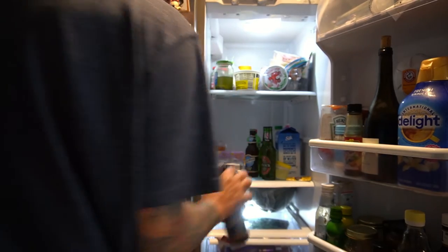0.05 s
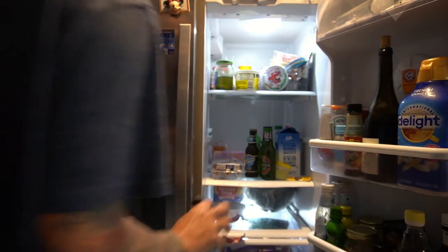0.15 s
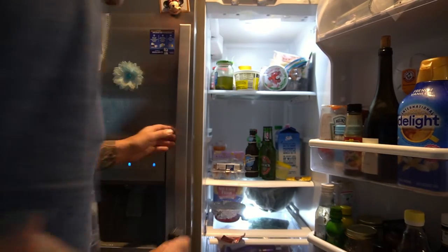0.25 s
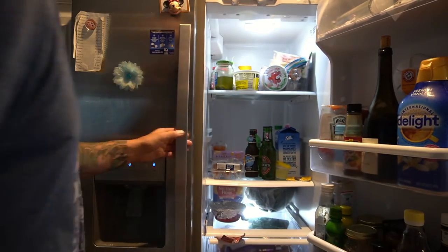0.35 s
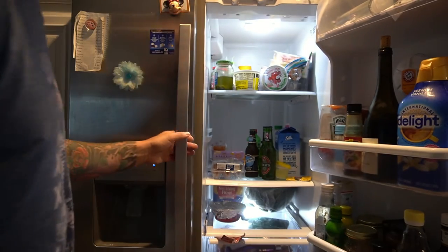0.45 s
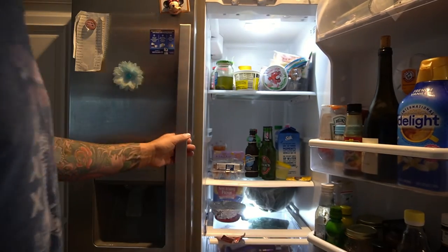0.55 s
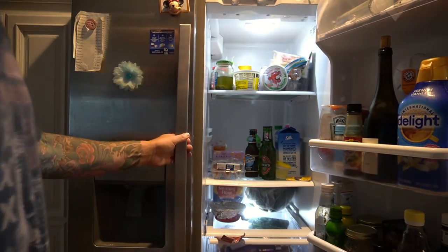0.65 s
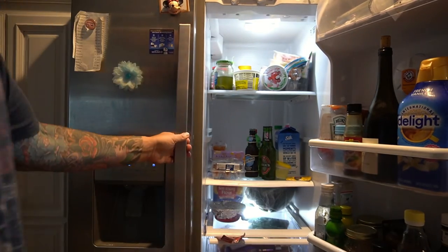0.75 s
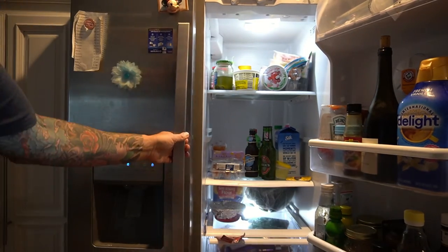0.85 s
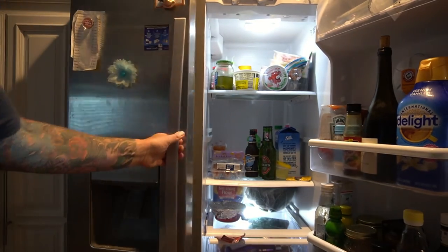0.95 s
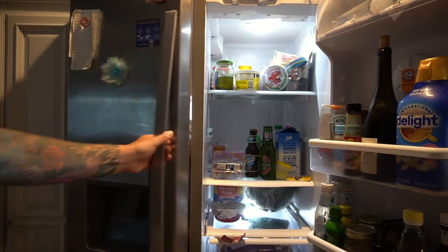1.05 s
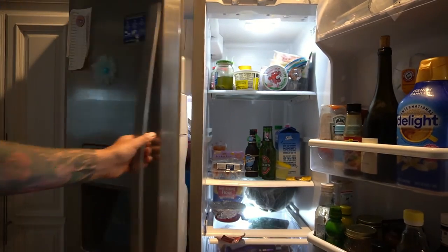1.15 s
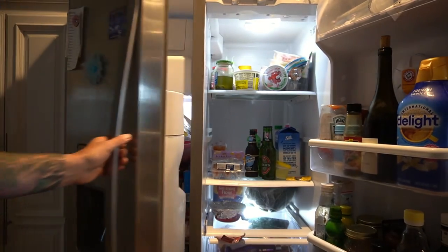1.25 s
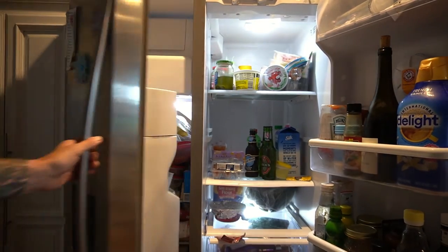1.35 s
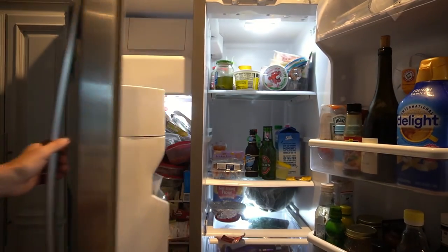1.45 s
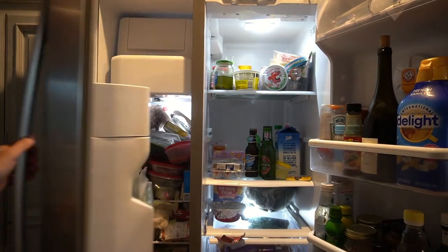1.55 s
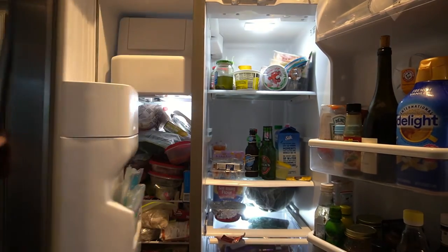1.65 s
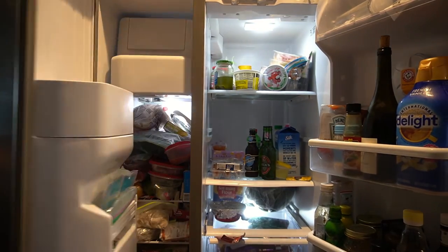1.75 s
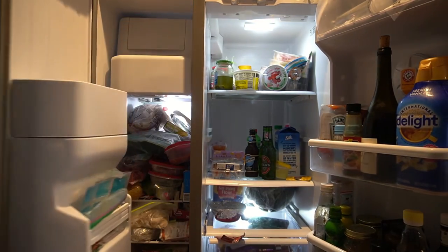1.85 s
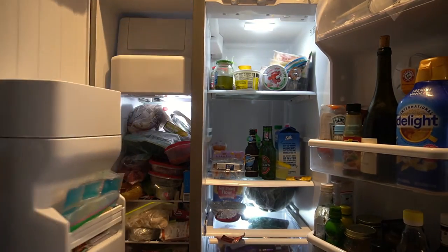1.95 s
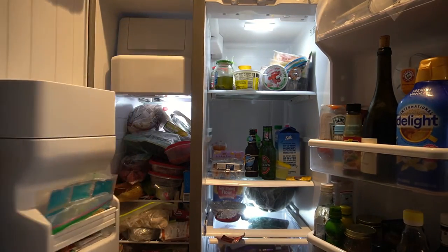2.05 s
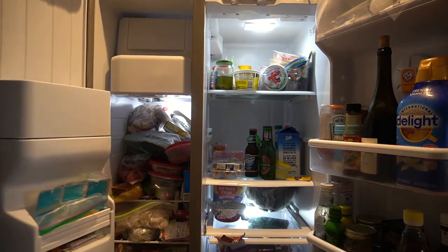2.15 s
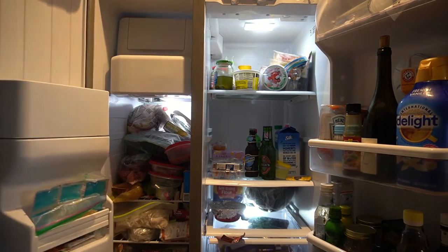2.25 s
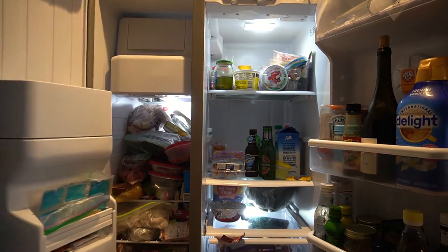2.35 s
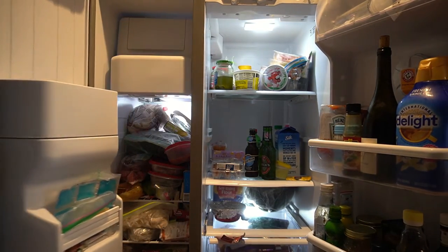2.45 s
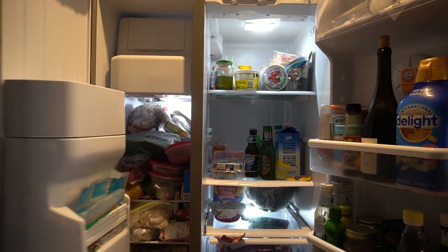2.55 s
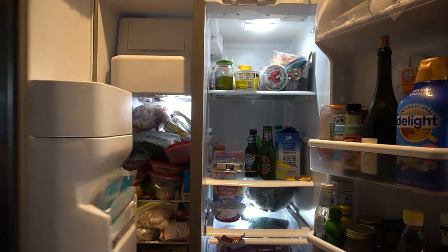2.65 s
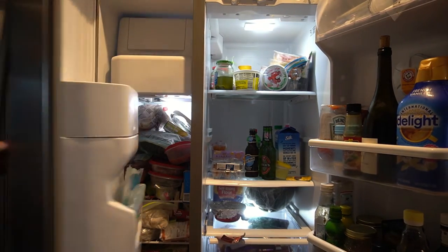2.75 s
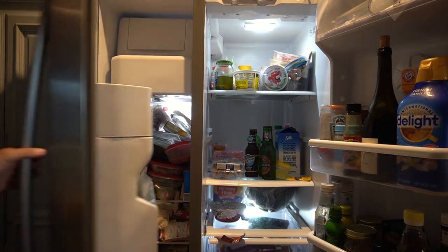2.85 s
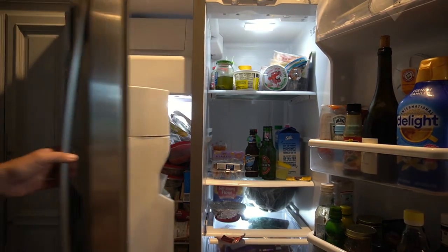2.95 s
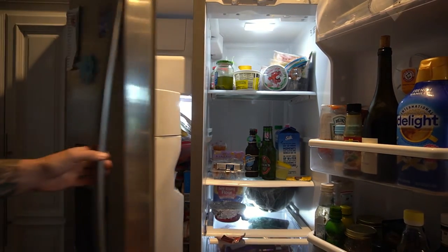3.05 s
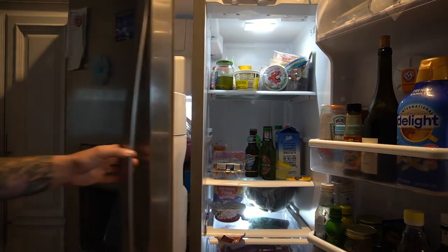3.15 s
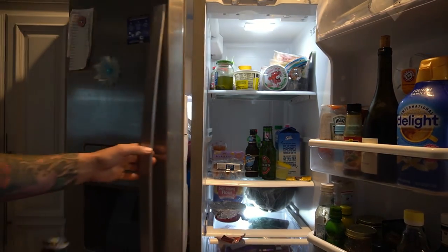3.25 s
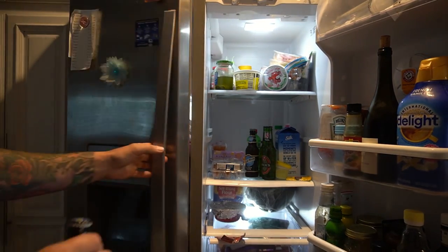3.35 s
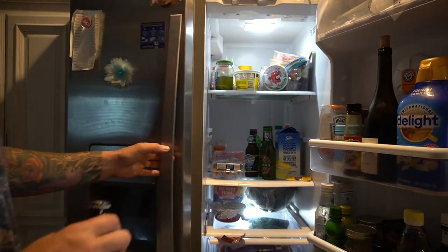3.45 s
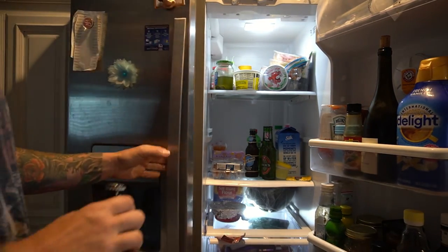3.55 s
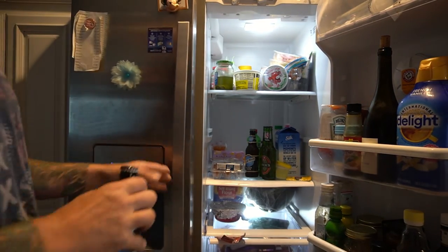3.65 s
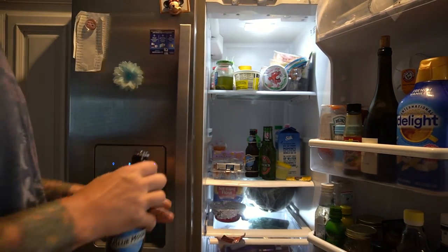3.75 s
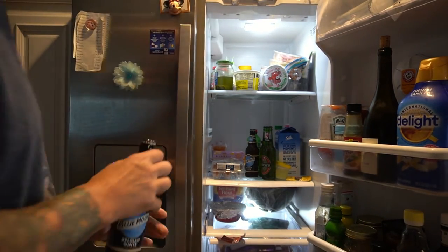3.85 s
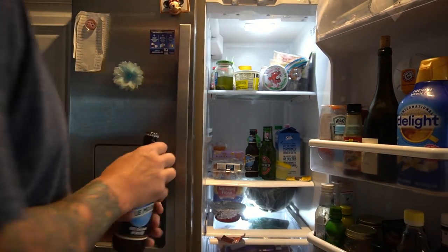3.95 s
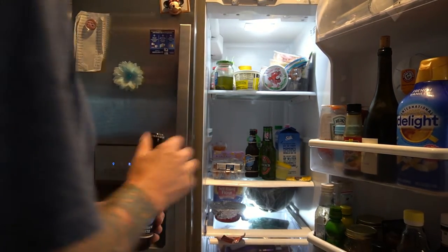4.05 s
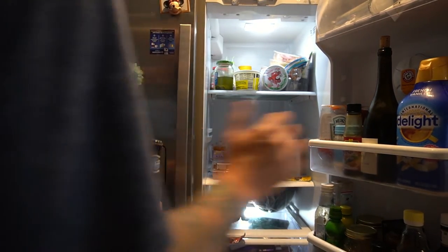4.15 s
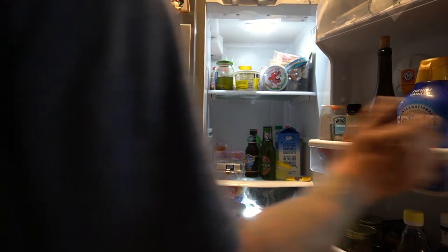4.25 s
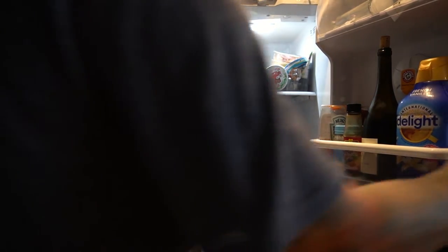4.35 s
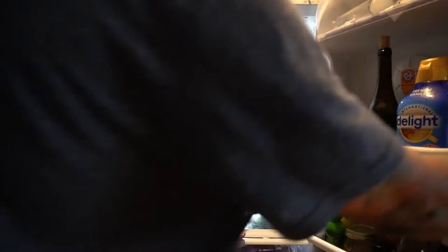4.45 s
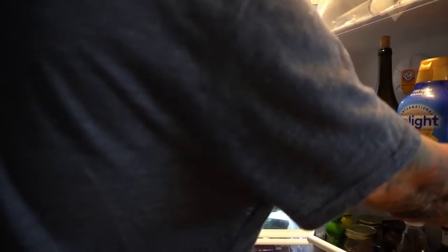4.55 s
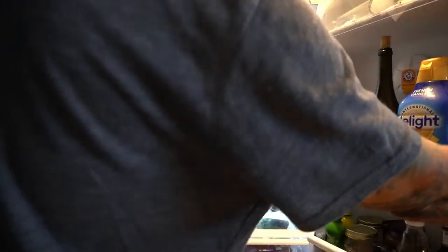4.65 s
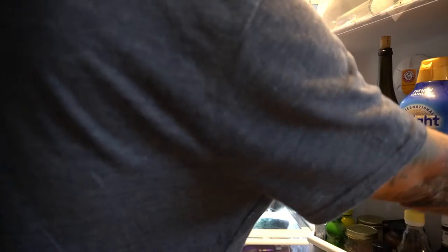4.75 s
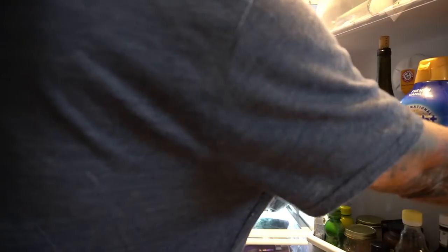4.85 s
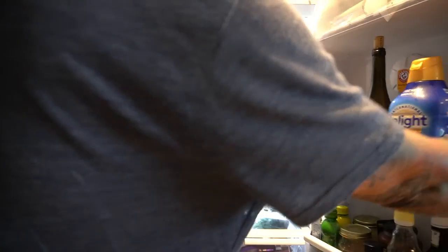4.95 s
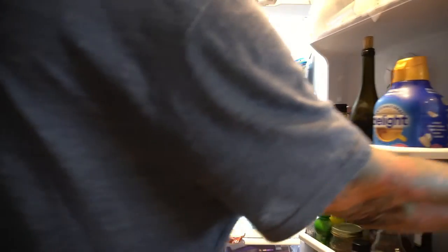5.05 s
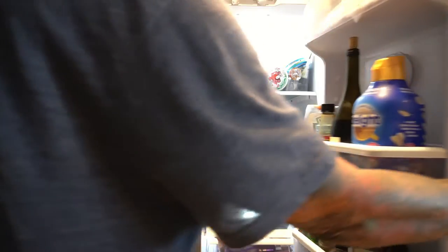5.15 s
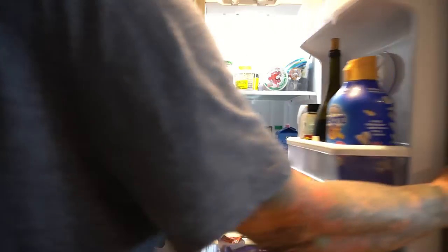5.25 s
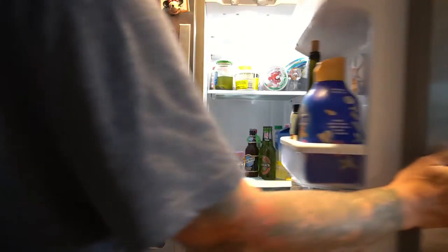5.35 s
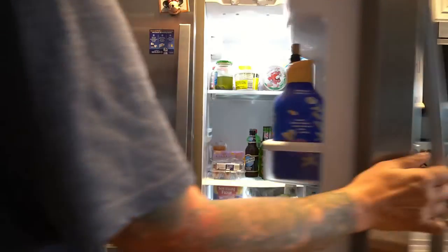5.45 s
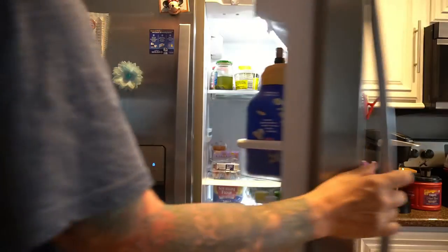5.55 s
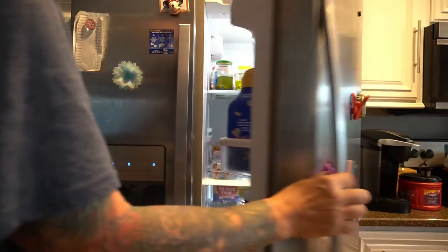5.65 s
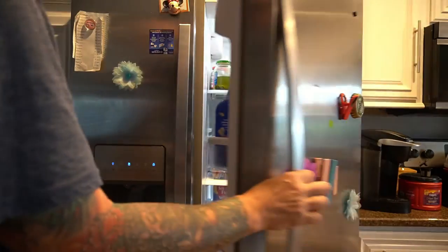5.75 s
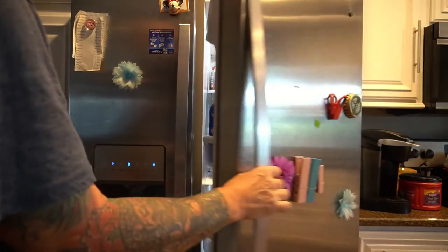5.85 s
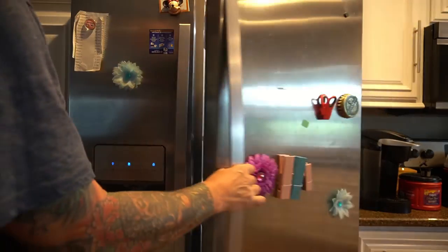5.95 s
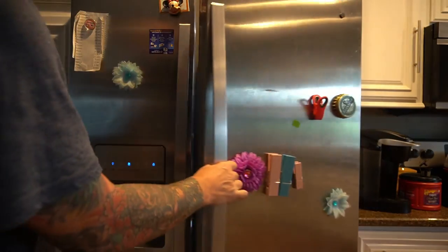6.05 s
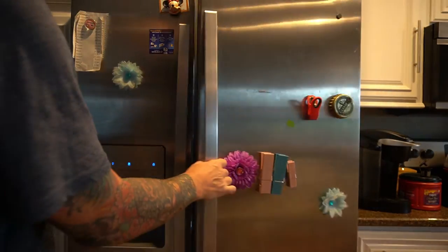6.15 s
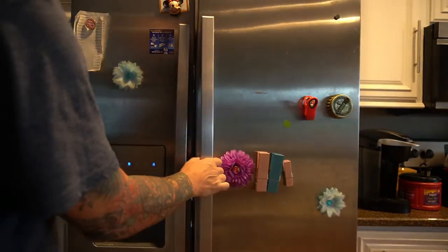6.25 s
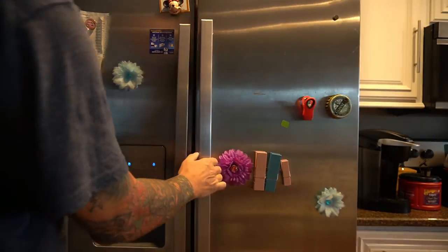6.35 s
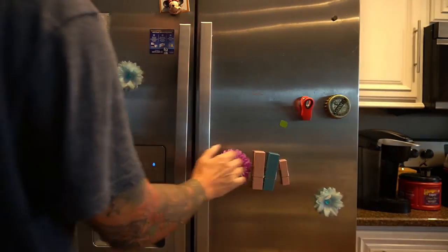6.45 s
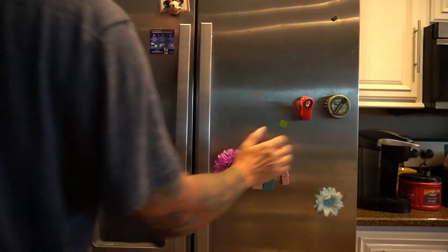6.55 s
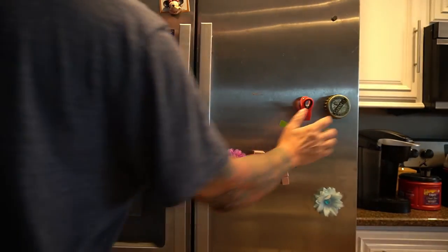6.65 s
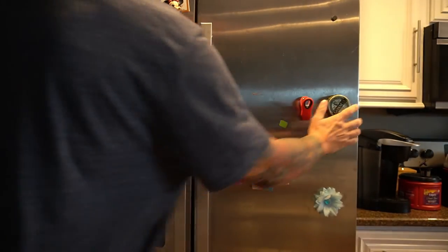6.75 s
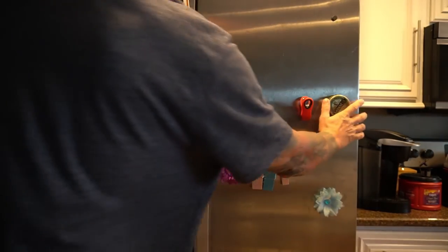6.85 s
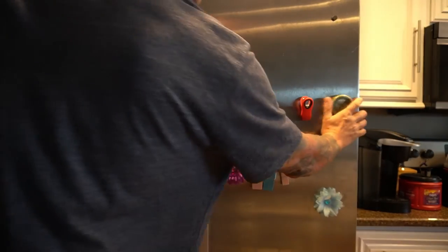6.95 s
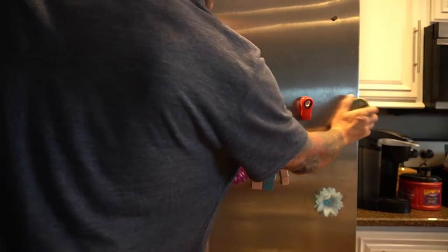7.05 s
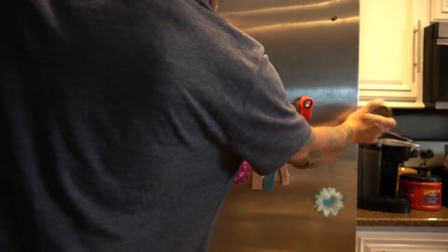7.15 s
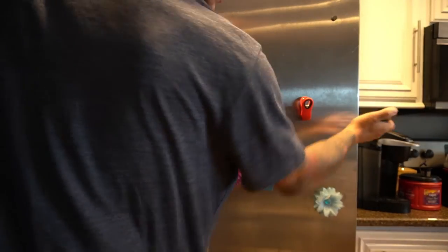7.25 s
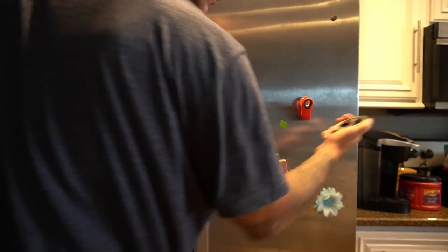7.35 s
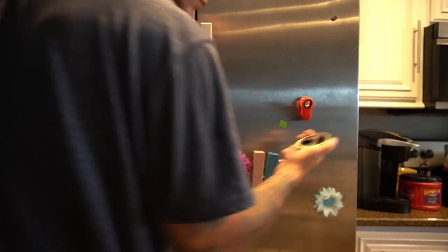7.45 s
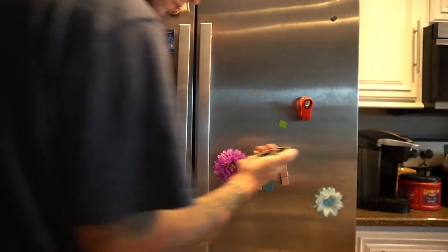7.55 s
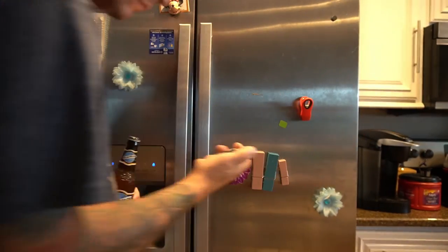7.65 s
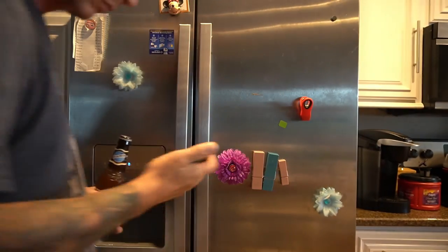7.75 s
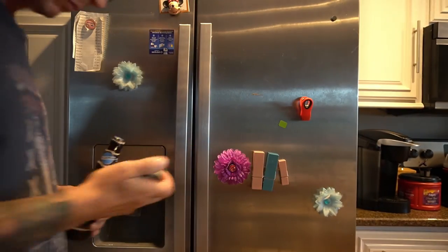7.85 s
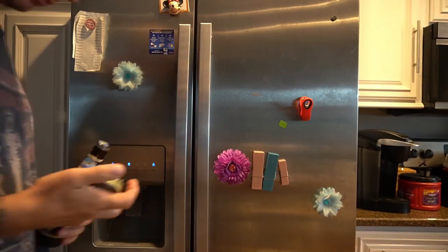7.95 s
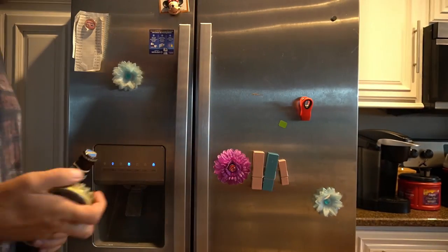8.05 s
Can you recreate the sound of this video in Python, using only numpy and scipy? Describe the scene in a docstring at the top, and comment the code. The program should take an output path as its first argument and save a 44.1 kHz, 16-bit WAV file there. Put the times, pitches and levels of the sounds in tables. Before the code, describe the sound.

A refrigerator hums as a freezer seal peels open, its fan swells, doors thud shut, a shelf knocks, and a magnetic opener clacks on steel.

```python
"""A steel two-door refrigerator hums in a lively kitchen as its doors are handled: struck parts are chatters of
tiny contacts plus decaying modes, answered by a decaying-noise room. The freezer gasket peels in snaps, the door's
closer ticks and clacks and it thuds shut; a bottle is tapped, something is set on a shelf, and the other door shuts.
A magnetic bottle opener is pulled off and knocks the steel. The fan, a tone in rushing air, is louder while the
freezer is open; steady lines form the compressor's hum, and filtered noise the cloth, hinge rub and still room."""
import sys
import numpy as np
from scipy import signal
from scipy.fft import rfft, irfft, next_fast_len
from scipy.io import wavfile
from scipy.ndimage import uniform_filter1d

SR = 44100
rng = np.random.default_rng(int(sys.argv[2]) if len(sys.argv) > 2 else 0)


def to_wav(s):
    """Save 16-bit WAV."""
    ch = np.atleast_2d(s).T  # columns
    pcm = np.round(np.clip(ch, -1, 1) * 32767)  # PCM
    wavfile.write(sys.argv[1], SR, pcm.astype(np.int16))


N = 358091
TIME = np.arange(N) / SR

# Spectrum of the still room. Each row: frequency in Hz, relative level in dB.
AMBIENCE_COLOUR = [(15, -59), (25, -25), (43, -7.5), (68, -8), (87, -9.5), (123, -11.5), (153, -15),
                   (206, -0.5), (263, -11.5), (416, -11), (545, -14.5), (1940, -29.5), (2410, -29),
                   (3080, -31), (16000, -42)]
AMBIENCE_DB = -47
# Reverberation of the kitchen. Each row: frequency in Hz, 60 dB decay time in s.
KITCHEN_T60 = [(60, 1.8), (200, 0.34), (500, 0.48), (1500, 0.6), (4000, 0.5), (8000, 0.55), (15000, 0.4)]
# Width of diffuse sound. Each row: frequency in Hz, side level minus mid level in dB.
WIDTH = [(60, -25), (130, -28), (250, -21), (500, -12.5), (1000, -6), (2000, -5), (4000, -1.5), (8000, -1)]

# Compressor and motor lines. Each row: frequency in Hz, mean rms level in dB.
HUM_LINES = [(59.2, -54.5), (119.5, -52), (193.5, -49.5), (296.1, -57.5), (414.5, -54.5), (1480, -78.5),
             (1695, -73.5), (2998, -75.5), (3117, -70)]
# Air rushing through the fan. Each row: frequency in Hz, relative level in dB.
FAN_AIR_COLOUR = [(60, -22), (100, -6), (135, -14), (158, -2), (175, -17), (205, -1), (232, 5.5),
                  (265, -9.5), (400, -12), (600, -19), (1100, -33), (1480, -28), (2200, -35.5),
                  (8000, -45.5), (16000, -71)]
# Doors that let the fan out. Each row: opens in seconds, shuts in seconds, tone level added when wide open in dB.
OPEN_DOORS = [(0.9, 3.88, -33), (-1, 6.45, -45.5)]
FAN_HZ, FAN_SHUT_IN_DB = 209.9, -56.5
OPENING_S, CLOSING_S = 0.52, 0.91

# Swishes of a shirt. Each row: centre in seconds, level in dB, standard deviation in s, share of fine hiss 0-1.
SWISHES = [(.195, -56.5, 0.039, 0.05), (0.296, -54, 0.022, 0), (0.42, -57.5, 0.047, 0.74),
           (2.596, -58, 0.24, 0.23), (4.353, -46, 0.029, 0.16), (5.76, -59, 0.084, 0),
           (6.833, -46, 0.034, 0.08), (7.053, -41, 0.036, .5), (7.832, -54, 0.07, .13)]
# Spectra of rubbing cloth and of its fine hiss. Each row: frequency in Hz, relative level in dB.
CLOTH_COLOUR = [(200, -27.5), (1000, 0), (2200, 1.5), (3300, 3.5), (5000, -2.5), (7000, 0), (10000, -8),
                (16000, -24)]
CLOTH_HISS_COLOUR = [(1000, -20), (5000, -4), (10000, 0), (16000, -8)]
# Level of the rubbing hinge. Each row: time in seconds, level in dB.
HINGE_RUB_LEVEL = [(5.2, -91.5), (5.38, -65), (5.55, -59), (5.75, -90)]
# Spectrum of the rubbing hinge. Each row: frequency in Hz, relative level in dB.
HINGE_RUB_COLOUR = [(1000, -26), (3600, -6), (4200, -4), (4800, -22), (10000, -18), (16000, -35)]

# Creaking ticks of the door closer. Each row: start in seconds, level in dB, contact time in s, tilt in dB per octave.
CLOSER_TICKS = [(1.273, -45.5, 0.02, -2.5), (3.341, -47, 0.036, 1), (3.430, -38, 0.014, -1.5),
                (3.509, -38, 0.02, 3.5), (3.568, -35, 0.022, 1.5)]
# A hand takes hold of a door or brushes it. Each row: start in seconds, level in dB, contact time in s.
HAND_TOUCHES = [(.591, -47, .041), (.660, -48.5, 0.03), (4.490, -47.5, 0.023), (6.180, -46, 0.027),
                (6.307, -41, .006)]
HAND_BRIGHT_DB = -6  # per octave
# Soft steps. Each row: start in seconds, level in dB.
STEPS = [(.70, -36), (2.17, -38.5), (2.359, -36.5), (4.491, -40.5)]

# Blows on bottle, shelf, doors and opener. Each row: start in seconds, level in dB, contact time in s.
BOTTLE_TAPS = [(4.020, -38.5, 0.0061)]
SHELF_KNOCKS = [(4.755, -37.5, .0025), (4.762, -41, .003), (4.866, -24.5, 0.011), (4.939, -31.5, 0.015)]
MAGNET_PULLS = [(6.8988, -27.5, 0.0018)]
OPENER_KNOCKS = [(7.0545, -20.5, 0.0032), (7.059, -18, 0.0092)]
HINGE_CLICKS = [(5.998, -30.5, .004)]
FRIDGE_SHUTS = [(6.5055, -19.5, 0.0035)]
CLOSER_CLACKS = [(3.6205, -34.5, 0.0035), (3.623, -26, 0.0019), (3.627, -24, .0021)]
FREEZER_SHUTS = [(3.7593, -23, 0.0051)]

# Spectra of the contacts, the first for ticks and hands alike. Each row: frequency in Hz, relative level in dB.
TICK_COLOUR = [(150, -19), (450, -6), (1200, -1), (3000, -1), (6500, -3), (10000, -11), (16000, -27)]
FLOORBOARD_COLOUR = [(20, -48), (42, -11), (95, 3.5), (160, -3), (300, -9.5), (1500, -34), (8000, -73)]
BOTTLE_COLOUR = [(200, -7), (450, 0.5), (700, -3), (1000, -16), (2500, -17.5), (6000, -27.5), (16000, -50)]
SHELF_COLOUR = [(88, -24), (150, -0.5), (286, -6.5), (398, 4), (774, -6.5), (1100, -6), (1290, -17),
                (1420, -3), (1720, -13), (3040, -11.5), (4490, -24), (6640, -24.5), (14200, -44.5),
                (16000, -65)]
MAGNET_COLOUR = [(59, -52), (100, -33), (150, 0), (234, -5.5), (322, 1), (415, -9.5), (648, -9.5),
                 (910, -13), (1010, -13), (1360, -14), (1520, -10.5), (3780, -24.5), (8110, -25.5),
                 (14400, -36), (16000, -51)]
OPENER_COLOUR = [(71, -55), (120, -19), (217, -7), (272, -14), (503, -7), (557, -8), (617, 1), (773, -5.5),
                 (968, -3.5), (2020, -15.5), (2200, -19), (2430, -20), (7820, -29.5), (15000, -44),
                 (16000, -54)]
HINGE_COLOUR = [(160, -9.5), (300, -9.5), (480, -5.5), (720, -3.5), (1050, -12.5), (1400, -17),
                (1800, -14.5), (3700, -16), (4600, -11), (6750, -19.5), (7900, -14.5), (9800, -38),
                (15000, -44), (16000, -60)]
FRIDGE_COLOUR = [(47, -8), (80, -15), (107, -0.5), (125, -55), (156, -2.5), (271, -18), (413, -4),
                 (451, -6), (937, -3), (1200, -14), (1670, -13.5), (4230, -30.5), (8050, -28),
                 (13400, -47.5), (16000, -70)]
CLOSER_COLOUR = [(200, -29), (430, 5.5), (640, -8), (1100, -2), (1700, 0), (2500, -14), (3600, -5),
                 (4500, -19), (7000, -23), (16000, -46)]
FREEZER_COLOUR = [(71, -30), (120, -12.5), (163, -1), (301, -9), (402, -6), (445, -6.5), (773, -11),
                  (856, -14.5), (1010, -13.5), (1210, -15), (7660, -30), (14700, -49.5), (16000, -56)]
GASKET_COLOUR = [(150, -25), (250, -1), (393, -3), (444, -3.5), (686, -4), (1450, -8.5), (2760, -10),
                 (5440, -15.5), (6140, -11.5), (12500, -24), (16000, -36)]

# Modes of the steel skin, the cabinet, the enclosed air, the loaded shelf and the flexing door front.
# Each row: frequency in Hz, mean relative level in dB, 60 dB decay time in s.
SKIN_MODES = [(425, -7, .4), (492, -3, .6), (513, -2, .5), (619, -1, .5), (677, 0, .55), (786, -4, .45),
              (836, -1, .5), (866, 0, .55), (990, -1, .5), (1065, -4, .45), (1147, -4, .55), (1318, -4, .5),
              (1367, -8, .45), (1533, -6, .55), (1593, -9, .5), (1796, -9, .45), (2029, -8, .45),
              (2385, -14, .3), (2912, -16, .3)]
CABINET_MODES = [(83.3, -3.5, 0.37), (97.8, 2, 0.32), (156, 0.5, 0.29)]
AIR_POCKET_MODES = [(36, -8, 0.2), (47.4, -1, 0.3), (65, -1.5, 0.2)]
SHELF_MODES = [(99.8, 0, 0.49), (422, 0, .14), (544, -3.5, 0.56), (1074, 0, 0.44), (1138, -4, 0.45),
               (1437, -3.5, 0.48), (2099, -8, 0.29), (2650, -10, 0.28)]
FLEX_MODES = [(160.5, 1, 0.36), (182.5, -4, .25), (324.5, 5.5, 0.26), (349, -9, .18)]
SHELF_S, SHELF_DB = 4.868, -30.5
FLEX_S, FLEX_DB = 6.900, -25
RATTLE_LAG = .33  # share of the rattle's length
SOFT_DULLING = 0.18  # dB per octave, per dB below the hardest blow
SEAL_LEAD_S = .0085

# Gasket snaps. Each row: start in seconds, level in dB, contact time in s, squelch centre in Hz.
GASKET_SNAPS = [(.814, -37.5, 0.018, 690), (.852, -34.5, 0.0081, 960), (.897, -42, .012, 1800),
                (.940, -41, 0.006, 1800), (.956, -32, 0.0057, 483), (.978, -35, .014, 2670),
                (1.009, -30, .014, 420), (1.028, -30, 0.0031, 336), (1.111, -43, 0.012, 6000)]
# Spectrum of one squelch. Each row: frequency as a ratio to its centre, relative level in dB.
SQUELCH_SHAPE = [(.1, -45), (.6, -20), (.85, -12), (1, -4), (1.18, -11.5), (1.6, -17), (8, -54)]
# Tilt of the snaps. The pair: door still held, door free, in dB per octave.
PEEL_BRIGHT_DB = (-2.5, 1.5)
# Cabinet thump relative to the snap. The pair: door still held, door free, in dB.
PEEL_THUMP_DB = (4.5, -15)
PEEL_START_S, PEEL_S = 0.818, 0.2
# Lip levels are relative to the snap; the squeak fades over QUICK_SNAP_S of contact time.
SQUELCH_DB, SQUEAK_DB, SQUEAK_HZ, QUICK_SNAP_S = -.5, 7.0, 6100, 0.0037


def from_db(db):
    """Logarithmic level: twenty decibels make a tenfold amplitude gain."""
    return 10 ** (np.asarray(db) / 20)


def at_hz(points, hz):
    """Spectral interpolation: a table is read linearly over log frequency."""
    f, value = np.transpose(points)
    return np.interp(np.log(np.maximum(hz, 1)), np.log(f), value)


def rms_one(x):
    """Normalisation of power: scale to an rms value of 1."""
    return x / np.sqrt(np.mean(x ** 2) + 1e-20)


def add(track, s, sound):
    """Superposition: sum a sound into a stereo track at a time in seconds."""
    start = round(s * SR)
    track[:, start:start + sound.shape[-1]] += sound[..., :N - start]


def drift(rate):
    """Low-passed noise: slow random motion of rms 1, rolled off around a rate in Hz."""
    hz = np.fft.rfftfreq(N, 1 / SR)
    return rms_one(irfft(rfft(rng.standard_normal(N)) / (1 + (hz / rate) ** 2), N))


def diffuse(spectrum, size=N):
    """Diffuse field: coloured stereo noise, coherent in the bass and wide in the treble."""
    padded = next_fast_len(size, True)
    hz = np.fft.rfftfreq(padded, 1 / SR)
    mid, side = rfft(rng.standard_normal((2, padded))) * from_db(at_hz(spectrum, hz))
    width = from_db(at_hz(WIDTH, hz))
    pair = np.array([mid + width * side, mid - width * side]) / np.sqrt(1 + width ** 2)
    return rms_one(irfft(pair, padded)[:, :size])


def minimum_phase(magnitude):
    """Causality: folding the cepstrum forward lets a part ring only after it is touched."""
    half = 8192 // 2
    cepstrum = irfft(np.log(magnitude + 1e-12))
    cepstrum[:, 1:half] *= 2
    cepstrum[:, half + 1:] = 0
    return np.exp(rfft(cepstrum))


def contact(spectrum, length, tilt_db, grain_db=4.5, first_touch=0.2, softness=0.3, clump_db=2.0, spread_db=-4.0):
    """Micro-impacts: a clumpy chatter swells and decays, coloured by the part; its mid energy is that of 30 ms at rms 1."""
    size = 8192
    t, hz = np.arange(size) / SR, np.fft.rfftfreq(size, 1 / SR)
    clumps = np.interp(t, t[::128], rng.standard_normal(size // 128))
    grip = from_db(grain_db * rng.standard_normal(size) + clump_db * clumps)
    envelope = np.exp(-t / length) * (1 - np.exp(-t / (softness * length)))
    chatter = rng.standard_normal((2, size)) * grip * envelope
    # the clean first click weakens with contact time
    chatter[0, 0] += first_touch * np.linalg.norm(chatter[0]) * np.exp(-length / 0.072)
    force = rfft(chatter)
    # dividing by the smoothed force spectrum leaves the part's own colour
    even = np.sqrt(uniform_filter1d(np.abs(force) ** 2, size=36))
    tilt = tilt_db * np.log2(np.maximum(hz, 300) / 1000)
    colour = from_db(at_hz(spectrum, hz) + tilt) / even
    # large panels reach the two sides differently in the treble
    colour[1] *= from_db(at_hz(WIDTH, hz) + spread_db)
    mid, side = irfft(force * minimum_phase(colour))
    return np.array([mid + side, mid - side]) / np.linalg.norm(mid) * np.sqrt(.03 * SR)


def ring(modes, spread_db, rise, size=36000):
    """Modal superposition: decaying sines of random strength and sign, as the spot struck would set them."""
    t = np.arange(size) / SR
    hz, db, t60 = np.transpose(modes)[:, :, None]
    strength = from_db(db + spread_db * rng.standard_normal(hz.shape)) * rng.choice([-1, 1], hz.shape)
    decay = np.exp(-np.log(1000) * t / t60)
    onset = 1 - np.exp(-t / rise)
    return np.sum(strength * decay * np.sin(2 * np.pi * hz * t), 0) * onset


def kitchen(x, size=36000):
    """Reverberation: dense reflections as noise, each band decaying exponentially at its own rate."""
    t = np.arange(size) / SR
    hz = np.fft.rfftfreq(size, 1 / SR)
    noise, tail = rfft(diffuse([(1, 0), (SR, 0)], size=size)), 0
    centres = np.array(KITCHEN_T60)[:, 0]
    # overlapping bands share the spectrum, each scaled to equal decay energy
    for share, (_, t60) in zip(np.eye(len(centres)), KITCHEN_T60):
        band = irfft(noise * at_hz(np.column_stack([centres, share]), hz), size)
        decay = np.exp(-np.log(1000) * t / t60)
        tail = tail + band * decay * np.sqrt(2 * np.log(1000) / (t60 * SR))
    build_up = 1 - np.exp(-(t / .007) ** 2)
    return signal.fftconvolve(x[None], tail * build_up, axes=1)[:, :N]


def in_kitchen(sounds):
    """Linear superposition: direct sounds sum with the room's answer; each row: start in s, sound, room gain."""
    direct, to_room = np.zeros((2, 2, N))
    for s, sound, room_gain in sounds:
        add(direct, s, sound)
        add(to_room, s, room_gain * sound)
    return direct + kitchen(to_room.mean(0))


def ambience():
    """Stationary diffuse noise: the still room has a fixed spectrum and level."""
    return from_db(AMBIENCE_DB) * diffuse(AMBIENCE_COLOUR)


def compressor(waver_db=1.0):
    """Line spectrum: steady sines, each wavering slowly in level on its own."""
    out, knots = 0, np.linspace(0, TIME[-1], 40)
    for hz, db in HUM_LINES:
        waver = np.interp(TIME, knots, rng.standard_normal(len(knots)))
        phase = 2 * np.pi * (hz * TIME + rng.random())
        out = out + np.sqrt(2) * from_db(db + waver_db * waver) * np.sin(phase)
    return out


def fan(air_db=-7.5):
    """Transmission through an aperture: the power of blade tone and air noise grows with each door's gap."""
    power = from_db(FAN_SHUT_IN_DB) ** 2
    for opens, shuts, db in OPEN_DOORS:
        gap = np.clip(np.minimum((TIME - opens) / OPENING_S, (shuts - TIME) / CLOSING_S), 0, 1)
        power = power + gap * from_db(db) ** 2
    flutter = from_db(.6 * drift(8))
    phase = 2 * np.pi * FAN_HZ * TIME + .08 * drift(6)
    tone = np.sqrt(2) * np.sin(phase) * flutter
    return np.sqrt(power) * (tone + from_db(air_db) * diffuse(FAN_AIR_COLOUR))


def shirt(grain_db=4.0, room_db=1.5):
    """Sliding friction: cloth on cloth gives grainy noise in Gaussian swells, split between rub and fine hiss."""
    rub, hiss = np.zeros((2, N))
    for s, db, length, fine in SWISHES:
        swell = from_db(db) * np.exp(-.5 * ((TIME - s) / length) ** 2)
        rub += (1 - fine) * swell
        hiss += fine * swell
    grain = from_db(grain_db * drift(33))
    cloth = grain * (rub * diffuse(CLOTH_COLOUR) + hiss * diffuse(CLOTH_HISS_COLOUR))
    return cloth + from_db(room_db) * kitchen(cloth.mean(0))


def hinge():
    """Dry friction: the turning hinge whispers as band-shaped noise with a moving level."""
    level = np.interp(TIME, *np.transpose(HINGE_RUB_LEVEL))
    return from_db(level) * diffuse(HINGE_RUB_COLOUR)


def handling(tick_room_db=0.0, step_room_db=-10.0):
    """Brief contact forces: the closer ticks, hands touch the doors more dully, and soft steps fall."""
    sounds = []
    for s, db, length, bright_db in CLOSER_TICKS:
        tick = from_db(db) * contact(TICK_COLOUR, length, bright_db)
        sounds.append((s, tick, from_db(tick_room_db)))
    for s, db, length in HAND_TOUCHES:
        touch = from_db(db) * contact(TICK_COLOUR, length, HAND_BRIGHT_DB)
        sounds.append((s, touch, from_db(tick_room_db)))
    for s, db in STEPS:
        step = from_db(db) * contact(FLOORBOARD_COLOUR, 0.025, 0)
        sounds.append((s, step, from_db(step_room_db)))
    return sounds


def shaken_door(s, skin_db, thump_db, thump_lag=0, skin_room_db=-12.5):
    """Modal excitation: the steel skin rings and the cabinet thumps, the thump without room sound."""
    skin = from_db(skin_db) * ring(SKIN_MODES, spread_db=1.5, rise=.003)
    thump = from_db(thump_db) * ring(CABINET_MODES, spread_db=1.0, rise=0.0017)
    return [(s, skin, from_db(skin_room_db)), (s + thump_lag, thump, 0)]


def blows(rows, spectrum, bright_db, rattle_db, rattle_s, rattle_bright_db, room_db, skin_db, thump_db):
    """Impact excitation: a strike, then a rattle of the same part; softer blows are duller and shake less."""
    sounds, hardest, lag = [], max(row[1] for row in rows), RATTLE_LAG * rattle_s
    for s, db, length in rows:
        dulling = SOFT_DULLING * (db - hardest)
        strike = from_db(db) * contact(spectrum, length, bright_db + dulling)
        rattle = from_db(db + rattle_db) * contact(spectrum, rattle_s, rattle_bright_db + dulling)
        sounds += [(s, strike, from_db(room_db)), (s + lag, rattle, from_db(room_db))]
        sounds += shaken_door(s, db + skin_db, db + thump_db, lag)
    return sounds


def sealing(rows, spectrum, touch_db, air_db, touch_s=0.0075, bright_db=-0.5):
    """Compression of enclosed air: a door touches its gasket just before the strike, then squeezes the air out."""
    sounds = []
    for s, db, _ in rows:
        air = from_db(db + air_db) * ring(AIR_POCKET_MODES, spread_db=1.0, rise=.01)
        touch = from_db(db + touch_db) * contact(spectrum, touch_s, bright_db)
        sounds += [(s - SEAL_LEAD_S, touch, 1), (s, air, 0)]
    return sounds


def shelf():
    """Impact and resonance: a bottle is tapped, then something is set on the loaded shelf, whose modes ring."""
    taps = blows(BOTTLE_TAPS, BOTTLE_COLOUR, bright_db=-0.5, rattle_db=-3.5, rattle_s=0.014,
                 rattle_bright_db=0.5, room_db=-2.5, skin_db=-25, thump_db=-22)
    knocks = blows(SHELF_KNOCKS, SHELF_COLOUR, bright_db=.5, rattle_db=-6.5, rattle_s=.03,
                   rattle_bright_db=1.0, room_db=-4.5, skin_db=-24, thump_db=-9.0)
    ringing = from_db(SHELF_DB) * ring(SHELF_MODES, spread_db=-1.0, rise=.002)
    return taps + knocks + [(SHELF_S, ringing, 0)]


def bottle_opener():
    """Elastic release: the magnet lets go and the door front flexes back; then the opener knocks the steel."""
    pulls = blows(MAGNET_PULLS, MAGNET_COLOUR, bright_db=1.0, rattle_db=5.0, rattle_s=.013,
                  rattle_bright_db=-.5, room_db=-2.5, skin_db=-15, thump_db=-18)
    flex = from_db(FLEX_DB) * ring(FLEX_MODES, spread_db=1.5, rise=0.0038)
    knocks = blows(OPENER_KNOCKS, OPENER_COLOUR, bright_db=0.34, rattle_db=-3.5, rattle_s=.048,
                   rattle_bright_db=-0.7, room_db=-0.1, skin_db=-7.5, thump_db=-28)
    return pulls + [(FLEX_S, flex, 0)] + knocks


def fridge_door():
    """Impact: the hinge clicks, then the door bangs shut on its seal and its load rattles."""
    clicks = blows(HINGE_CLICKS, HINGE_COLOUR, bright_db=-1.5, rattle_db=3.5, rattle_s=.015,
                   rattle_bright_db=0.1, room_db=-2.1, skin_db=-17, thump_db=-9.0)
    shuts = blows(FRIDGE_SHUTS, FRIDGE_COLOUR, bright_db=-0.86, rattle_db=-7.0, rattle_s=.044,
                  rattle_bright_db=0.0, room_db=0.0, skin_db=-16.0, thump_db=-24)
    return clicks + shuts + sealing(FRIDGE_SHUTS, FRIDGE_COLOUR, touch_db=-18.5, air_db=-3.5)


def gasket(room_db=3.0, lip_room_db=-13.0, skin_db=-18.0):
    """Stick and release: peeling snaps brighten as the door frees; the lip squelches, and squeaks on quick ones."""
    sounds = []
    for s, db, length, hz in GASKET_SNAPS:
        freed = (s - PEEL_START_S) / PEEL_S
        bright_db = np.interp(freed, [0, 1], PEEL_BRIGHT_DB)
        thump_db = np.interp(freed, [0, 1], PEEL_THUMP_DB)
        snap = contact(GASKET_COLOUR, length, bright_db)
        squelch = from_db(SQUELCH_DB) * contact(np.multiply(SQUELCH_SHAPE, [hz, 1]), length, 0)
        quickness = np.exp(-length / QUICK_SNAP_S)
        squeak_colour = np.multiply(SQUELCH_SHAPE, [SQUEAK_HZ, 1])
        squeak = from_db(SQUEAK_DB) * quickness * contact(squeak_colour, length, bright_db)
        sounds.append((s, from_db(db) * snap, from_db(room_db)))
        sounds.append((s, from_db(db) * (squelch + squeak), from_db(lip_room_db)))
        sounds += shaken_door(s, db + skin_db, db + thump_db)
    return sounds


def freezer_door():
    """Impact: the door clacks over its closer, then thuds shut on its seal."""
    clacks = blows(CLOSER_CLACKS, CLOSER_COLOUR, bright_db=0.5, rattle_db=-7.5, rattle_s=.023,
                   rattle_bright_db=-0.5, room_db=-6.5, skin_db=-28, thump_db=-41)
    shuts = blows(FREEZER_SHUTS, FREEZER_COLOUR, bright_db=3.0, rattle_db=3.0, rattle_s=.023,
                  rattle_bright_db=0.2, room_db=0.65, skin_db=-11.5, thump_db=-2.0)
    return clacks + shuts + sealing(FREEZER_SHUTS, FREEZER_COLOUR, touch_db=-9.0, air_db=7.0)


def scene():
    """Superposition: door blows and friction over the running refrigerator and the still room."""
    background = ambience() + compressor() + fan()
    friction = shirt() + hinge()
    knocks = in_kitchen(handling() + shelf() + bottle_opener() + fridge_door() + gasket() + freezer_door())
    return background + friction + knocks


def record(dry):
    """Band limiting: the microphone sheds the deepest bass, and a steep low-pass cuts the top of the treble."""
    low_cut = signal.butter(2, 24, "high", fs=SR, output="sos")
    high_cut = signal.ellip(10, .1, 80, 15900, fs=SR, output="sos")
    return signal.sosfilt(high_cut, signal.sosfilt(low_cut, dry))


dry = scene()
out = record(dry)
to_wav(out)
```